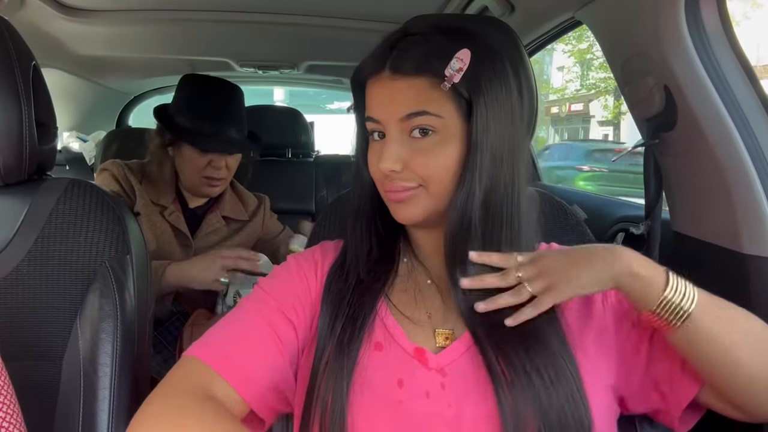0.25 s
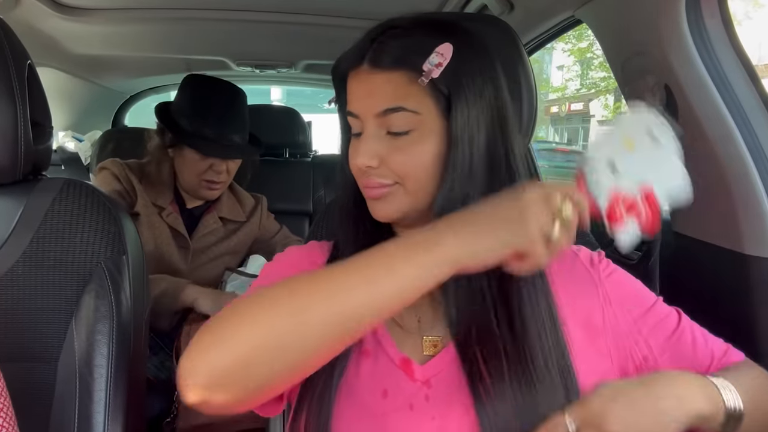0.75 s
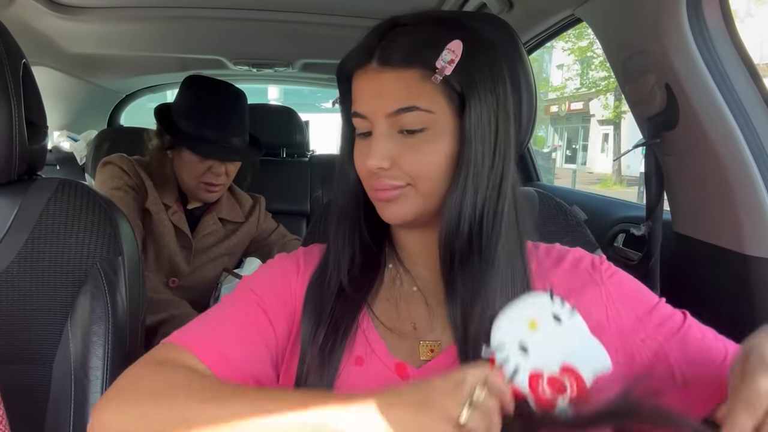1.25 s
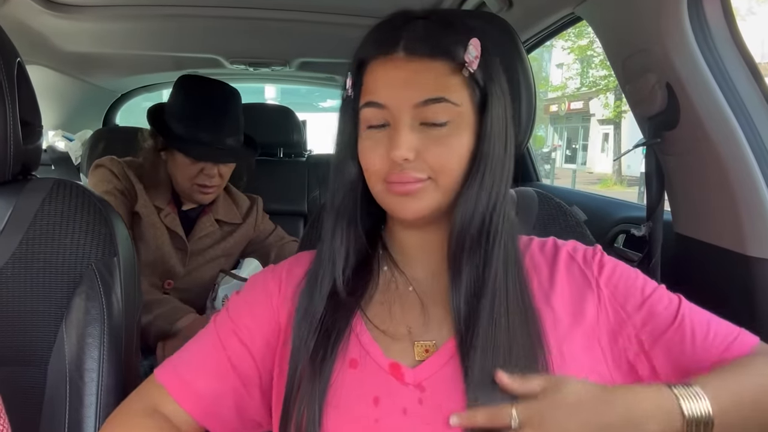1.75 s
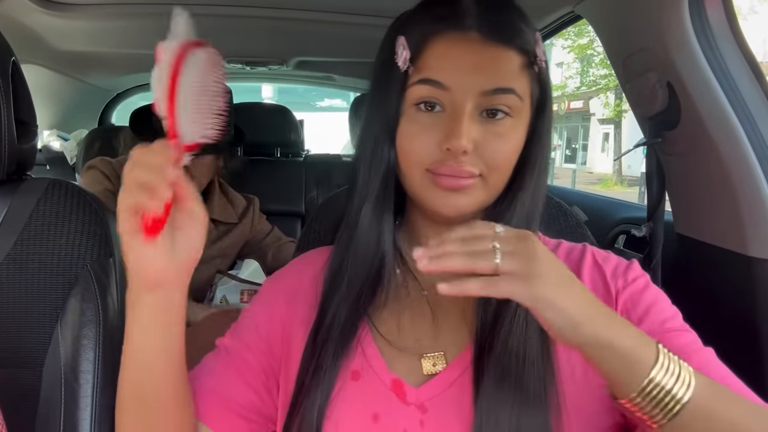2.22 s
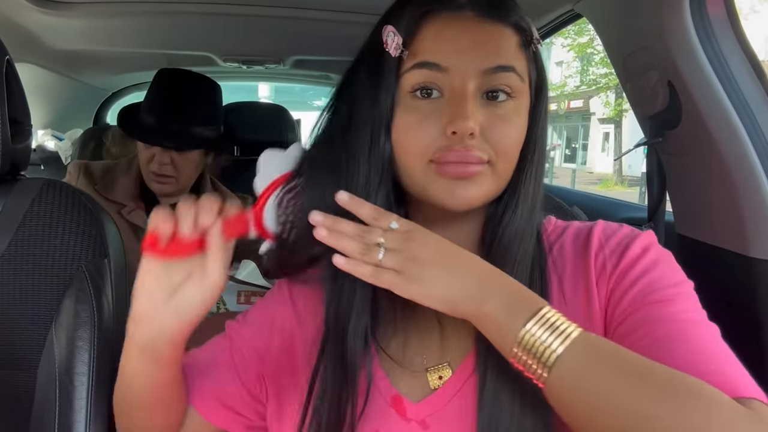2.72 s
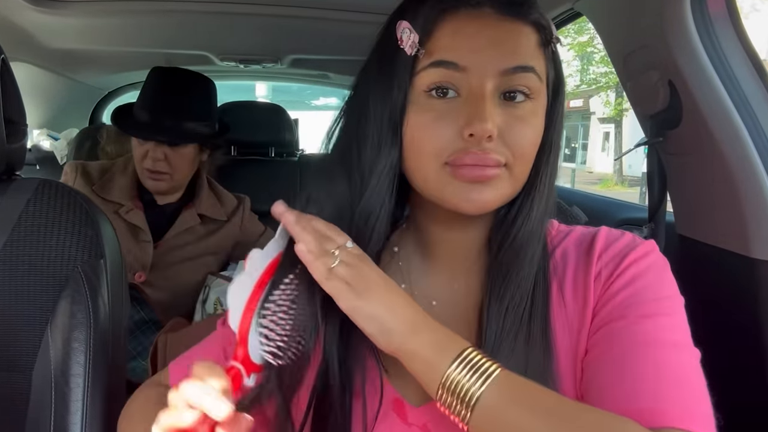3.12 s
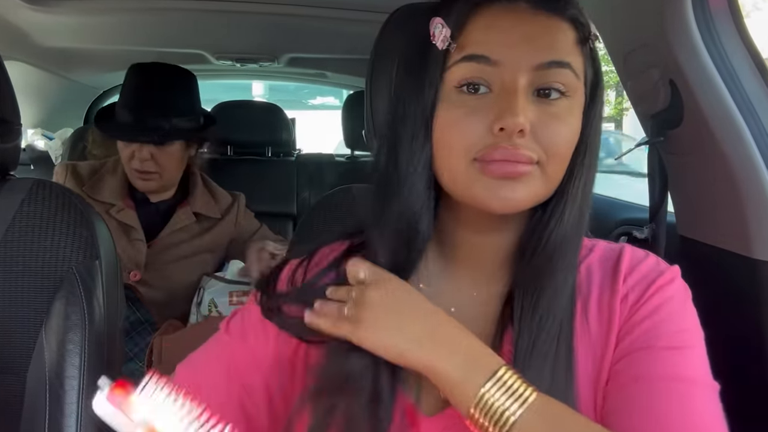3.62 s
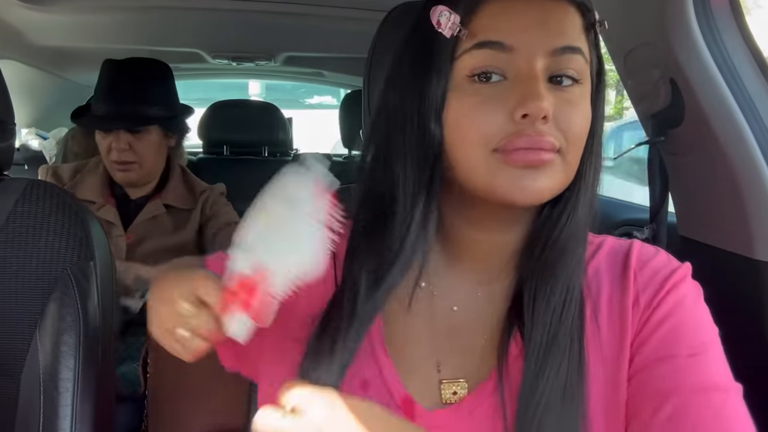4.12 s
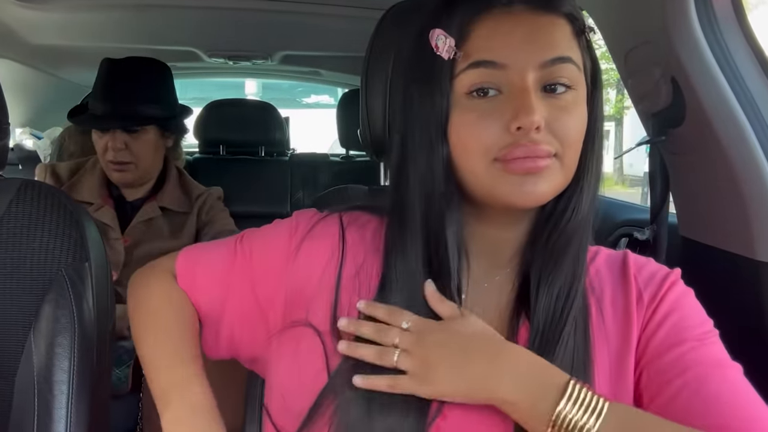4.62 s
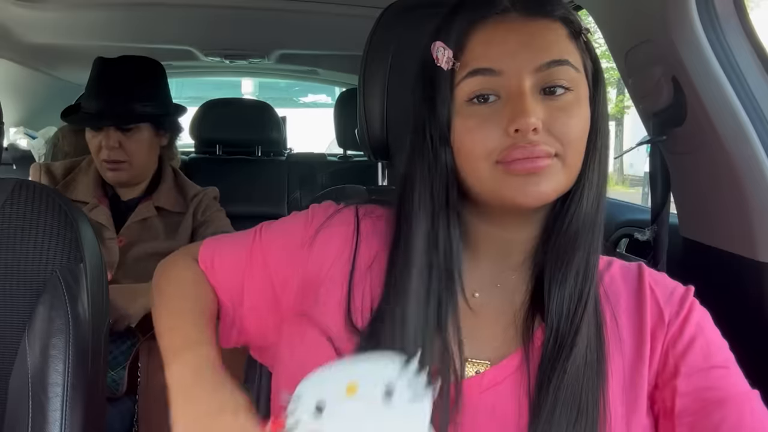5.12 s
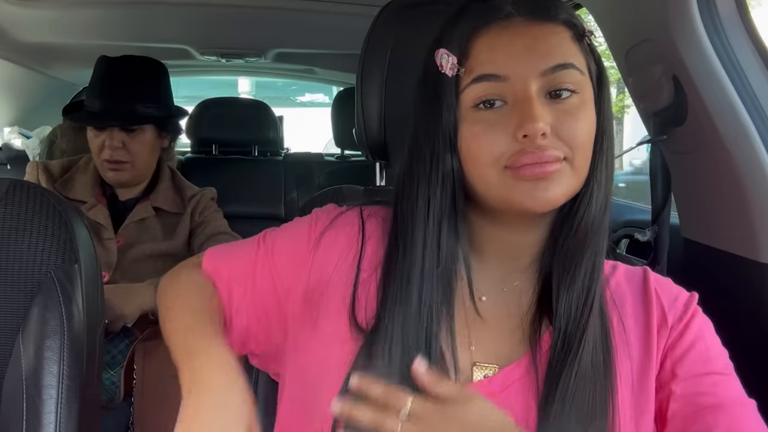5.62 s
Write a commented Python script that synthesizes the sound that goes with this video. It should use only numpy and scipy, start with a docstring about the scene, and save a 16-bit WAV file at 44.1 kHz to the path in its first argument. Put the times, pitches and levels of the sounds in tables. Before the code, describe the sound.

Inside a moving car, a low engine drone and tyre rumble while someone brushes long hair close by, with small clicks and hard plastic knocks.

```python
"""Throughout, the drone of an engine is heard inside a moving car, with a booming body and tyre rumble: wavering
tones and coloured noise. Close to the two ports of a phone on the dashboard, a passenger brushes and smooths long
hair (grainy friction noise); jewellery and small things tick and squeak. To the right a hollow thing is jostled
(slips and taps on resonances). The car takes a bump, and a plastic object knocks twice around it
and twice, harder, near the end (dying modes with a crack and a thud)."""
import sys
import numpy as np
from scipy import signal
from scipy.fft import rfft, irfft, next_fast_len
from scipy.io import wavfile
from scipy.ndimage import uniform_filter1d, map_coordinates

SR = 44100
rng = np.random.default_rng(int(sys.argv[2]) if len(sys.argv) > 2 else 0)


def put_to_file(sound):
    """Save the sound as 16-bit audio at rate SR, in the file named by the first command-line argument."""
    columns = np.atleast_2d(sound).T  # one column per channel
    safe = np.clip(columns, -1, 1)
    whole_steps = np.round(safe * 32767)
    wavfile.write(sys.argv[1], SR, whole_steps.astype(np.int16))


N = 258152
TIME = np.arange(N) / SR
AGE = TIME[:SR // 2]  # time since the start of a short sound, s
# what the two microphone ports hear of things close by: lag of the right port, s; direct share, 0-1
PORT_LAG_S, RASP_SHARE, HISS_SHARE = .00018, .35, .7


def undb(db):
    """Decibels to gain."""
    return 10 ** (np.asarray(db) / 20)


def unit(x):
    """Scale to rms 1."""
    return x / np.sqrt(np.mean(x ** 2))


def curves(table):
    """One control signal per column, in straight lines between the points."""
    s, *columns = np.transpose(table)
    return [np.interp(TIME, s, c) for c in columns]


def walk(rate):
    """Slow random wandering at rms 1, with rate fresh values per second."""
    k = int(SR / rate)
    steps = np.repeat(rng.standard_normal(N // k + 1), k)
    smooth = uniform_filter1d(uniform_filter1d(steps, k), k)
    return unit(smooth[:N])


def shape(x, gain):
    """Filter by a response given as a function of frequency."""
    n = x.shape[-1]
    size = next_fast_len(n + 4096)
    f = np.maximum(np.fft.rfftfreq(size, 1 / SR), 1)
    return irfft(rfft(x, size) * gain(f), size)[..., :n]


def colour(x, points):
    """Give x a response of (f/Hz, level/dB) points, at rms 1."""
    hz, db = np.transpose(points)
    return unit(shape(x, lambda f: undb(np.interp(np.log(f), np.log(hz), db))))


def band(f, hz, width):
    """Response of one resonance."""
    return 1 / (1 + 1j * (f * f - hz * hz) / (f * width))


def spread(x, wide_hz):
    """Two unrelated signals become left and right: alike in the bass, apart above wide_hz."""
    side = shape(x[1], lambda f: f / np.hypot(f, wide_hz))
    return np.array([x[0] + side, x[0] - side])


def ports(x, lag_s, share):
    """Close sound reaches the right port later and a quarter cycle turned; the rest is diffuse."""
    direct = shape(x[0], lambda f: 1j * np.exp(-2j * np.pi * f * lag_s))
    right = np.sqrt(share) * direct + np.sqrt(1 - share) * x[1]
    return np.array([x[0], right])


def pan(db):
    """Left and right gains for a left-minus-right level."""
    return undb(np.array([[db], [-db]]) / 2)


def add(out, s, db, sound):
    """Lay a sound into out at time s with the given peak level."""
    i = int(s * SR)
    scaled = undb(db) * sound / np.abs(sound).max()
    out[:, i:i + len(AGE)] += scaled[..., :N - i]


def fade(t60, rise):
    """Envelope of a blow: soft start, exponential fall."""
    return (1 - np.exp(-(AGE / rise) ** 2)) * np.exp(-np.log(1000) * AGE / t60)


def burst(t60, rise):
    """A dying puff of noise for each channel."""
    return rng.standard_normal((2, len(AGE))) * fade(t60, rise)


def ring(hz, t60, rise, skew):
    """A dying tone that reaches the two channels skew radians out of step."""
    offset = np.array([[skew], [-skew]]) / 2
    return np.sin(2 * np.pi * hz * AGE + offset) * fade(t60, rise)


def crackle(envelope, rate, size_db):
    """A cluster of tiny noisy slips of uneven size, timed alike in both channels."""
    slips = (rng.random(len(AGE)) < rate / SR) * undb(size_db * rng.random(len(AGE)))
    return rng.standard_normal((2, len(AGE))) * uniform_filter1d(slips, 8) * envelope


def friction(rate, size_db, grain_db):
    """Smooth sliding noise with many tiny slips of uneven size."""
    slips = (rng.random(N) < rate / SR) * undb(size_db * np.minimum(rng.exponential(size=N), 4))
    energy = signal.lfilter([1], [1, -np.exp(-1 / (0.0049 * SR))], slips)  # each slip dies over 4.9 ms
    loudness = np.sqrt(1 + undb(grain_db) ** 2 * energy / energy.mean())
    return rng.standard_normal((2, N)) * loudness


def bristle_ticks(count, size_db, t60):
    """Single bristles flick free, each with its own pitch and strength."""
    out = np.zeros((2, N))
    age = AGE[:SR // 50]
    for when, pitch, strength, turn in rng.random((count, 4)):
        hz = 1300 * 6 ** pitch
        i = int(when * (N - len(age)))
        phase = 2 * np.pi * (hz * age + np.array([[0], [turn]]))
        out[:, i:i + len(age)] += undb(-size_db * strength) * np.sin(phase) * np.exp(-np.log(1000) * age / t60)
    return unit(out)


# strokes of brush and hands over hair and cloth, before the gain of each layer:
# (t/s, length/s, level/dB, strand hiss relative to it/dB, cloth rub relative to it/dB)
HAIR_STROKES = [(0, 0.13, -55.5, 0, -12), (0.115, 0.24, -51, -6, -4), (0.405, 0.17, -44, -4, -4.5),
                (0.647, 0.12, -45, -4.5, 1.5), (0.85, 0.35, -49, -6, 5.5), (1.035, 0.06, -50, -1, -9),
                (1.137, 0.16, -53, -4, 2), (1.305, 0.22, -56.5, -3, 3), (1.546, 0.043, -50.5, -4.5, 0),
                (1.652, 0.36, -54, -3.5, 1), (2.053, 0.11, -46, -2.5, 4.5), (2.31, 0.38, -54, -5.5, 2),
                (2.663, 0.51, -50.5, -4, 5), (3.341, 0.18, -53.5, -5, 11.5), (3.499, 0.41, -45.5, -6.5, 2),
                (3.605, 0.1, -46, -6, -13), (3.89, 0.072, -41, -8, -6.5), (4.035, 0.16, -43, -7.5, 0),
                (4.25, 0.23, -51.5, -5.5, 7.5), (4.557, .25, -62.5, 2, 5), (4.833, 0.18, -53.5, -4.5, -6),
                (5.03, 0.062, -49, -2, 5.5), (5.09, 0.24, -50, -4, 2.5), (5.307, 0.4, -55, -8, 3.5),
                (5.724, 0.15, -46.5, -12, 6.5)]
# rustle between strokes, before the same gains: (level/dB, strand hiss relative/dB, cloth rub relative/dB)
RESTING_RUSTLE = (-62.5, -0.78, 2.1)
# a stroke grips, eases off as it travels, and lets go
GRIP_S, EASE_DB_PER_S, LET_GO_S = 0.019, 3.5, 0.073


def stroke_gains():
    """Gains of bristles, strands and cloth: each stroke swells out of a resting rustle."""
    rest_db, hiss_db, cloth_db = RESTING_RUSTLE
    power = undb(rest_db + np.array([[0], [hiss_db], [cloth_db]])) ** 2
    for s, length, db, hiss_db, cloth_db in HAIR_STROKES:
        age = np.maximum(TIME - s, 0)
        grip = np.minimum(age / GRIP_S, 1)
        let_go = np.exp(-np.maximum(age - length, 0) / LET_GO_S)
        envelope = grip * undb(-EASE_DB_PER_S * age) * let_go
        layers = undb(db + np.array([[0], [hiss_db], [cloth_db]]))
        power = power + (layers * envelope) ** 2
    return np.sqrt(power)


# colours of bristles, strands and cloth: (f/Hz, level/dB)
BRISTLE_COLOUR = [(500, -14), (1200, -4), (2400, 0), (3600, .5), (5500, -2.5), (7500, -1.5), (9500, -8),
                  (16000, -18)]
HAIR_STRAND_COLOUR = [(4000, -25), (9000, -15), (10800, -2), (13000, 0), (14500, -9), (16000, -10)]
SLEEVE_COLOUR = [(150, -12), (330, -2), (480, -3), (750, 0), (900, -2), (1350, 0), (1700, -8), (4000, -24)]
# centres of the ranges in which the bristles rasp: (f/Hz)
TUFT_BANDS = [1000, 1400, 2000, 2800, 4000, 5600, 8000]
# how unevenly the tufts let go: spread in dB, changes per s
TUFT_DB, TUFT_RATE = 2.8, 40


def hair(brush_db, strands_db, cloth_db):
    """Bristles rasp and tick, strands hiss and sleeves rub, all with the same strokes."""
    rasp, hiss, rub = stroke_gains()
    bristles = ports(friction(rate=270, size_db=12.5, grain_db=-8.0), PORT_LAG_S, RASP_SHARE)
    fibres = ports(friction(rate=500, size_db=6, grain_db=-2), PORT_LAG_S, HISS_SHARE)
    sleeves = spread(friction(rate=150, size_db=8.0, grain_db=6.5), wide_hz=560)
    # the rasp flickers in pitch as one tuft after another lets go
    tufts = 0
    for hz in TUFT_BANDS:
        tuft = shape(bristles, lambda f: band(f, hz, hz / 3))
        tufts = tufts + tuft * undb(TUFT_DB * walk(TUFT_RATE))
    ticks = undb(-7) * bristle_ticks(count=1500, size_db=20, t60=.007)
    brush = (colour(tufts, BRISTLE_COLOUR) + ticks) * rasp * undb(brush_db) * pan(db=-1.0)
    strands = colour(fibres, HAIR_STRAND_COLOUR) * hiss * undb(strands_db)
    cloth = colour(sleeves, SLEEVE_COLOUR) * rub * undb(cloth_db) * pan(db=-0.5)
    flicker = undb(1.1 * walk(40) + 1.0 * walk(14))
    return (brush + strands) * flicker + cloth


# short scratches of the brush through tangles: (t/s, peak level before gain/dB, centre f/Hz, length/s)
TANGLE_SCRATCHES = [(0.502, -30, 2400, 0.024), (0.54, -27.5, 3280, 0.026), (0.693, -30.5, 1900, 0.037),
                    (0.725, -32, 2200, 0.027), (.75, -35, 4500, 0.039), (.775, -40, 6000, .015),
                    (0.794, -31, 3000, 0.055), (0.873, -34.5, 1600, 0.039), (3.69, -30.5, 3500, 0.039),
                    (4.091, -31, 1900, 0.044), (4.888, -34, 7000, .02), (5.136, -29, 3400, 0.011)]


def scratches(gain_db):
    """The brush tears through a tangle: a short swell of bristle crackles."""
    out = np.zeros((2, N))
    for s, db, hz, length in TANGLE_SCRATCHES:
        swell = np.sin(np.pi * np.minimum(AGE / length, 1) ** .5)
        grains = crackle(swell, rate=900, size_db=9)
        add(out, s, db + gain_db, shape(grains, lambda f: band(f, hz, 1.6 * hz) ** 2))
    return out


# bristles and nails catching in the hair: (t/s, peak level before gain/dB, t60/s)
HAIR_SNAGS = [(0.3507, -29.5, 0.034), (0.4206, -34.5, 0.31), (1.0563, -30.5, 0.054), (2.098, -32.5, 0.21),
              (2.255, -36, 0.041), (3.8663, -28.5, 0.068), (3.919, -26, 0.2), (4.43, -40, 0.089),
              (4.469, -39, .061), (4.56, -42, .07), (4.618, -32, 0.12), (4.885, -41, 0.074),
              (5.373, -41, 0.032)]


def snags(gain_db):
    """Bristles and nails catch in the hair: bright puffs of noise close to the ports."""
    out = np.zeros((2, N))
    for s, db, t60 in HAIR_SNAGS:
        add(out, s, db + gain_db, shape(burst(t60, rise=t60 / 50), lambda f: band(f, 13500, 9600)))
    return ports(out, PORT_LAG_S, HISS_SHARE)


# clicks of jewellery and small things:
# (t/s, peak level before gain/dB, centre f/Hz, clear ring relative to the noise/dB)
SMALL_CLICKS = [(0.049, -56, 800, -12), (0.08, -40, 1760, -5), (.352, -32, 2780, -12),
                (0.363, -37.5, 900, -3), (0.39, -36, 1950, -15), (1.058, -33, 4500, -11),
                (1.074, -39, 2540, -12), (1.084, -35.5, 2140, -4), (1.098, -36.5, 3260, -1),
                (1.8325, -36.5, 1046, -7), (1.9962, -40.5, 1845, -9), (2.2553, -45, 2740, -3),
                (2.825, -37, 1200, -17), (2.863, -43, 2930, -2), (3.036, -44, 1060, -3),
                (3.103, -42, 1960, -5), (3.132, -42, 1210, -11), (3.402, -40, 2000, -16),
                (3.403, -32, 790, -7), (3.558, -37, 837, 1), (3.61, -41.5, 600, 1),
                (4.122, -33.5, 1300, -11), (4.2807, -34, 1370, -8), (4.305, -36, 1070, -4),
                (4.4861, -35.5, 1280, -12), (4.598, -44.5, 1290, -10), (4.635, -42.5, 1720, -5),
                (4.96, -39.5, 1390, -3), (5.628, -43.5, 2670, 4), (5.7144, -34, 2826, -2)]


def clicks(gain_db):
    """Jewellery and small things tick: a band of dying noise with a ring on one pitch."""
    out = np.zeros((2, N))
    for s, db, hz, ring_db in SMALL_CLICKS:
        puff = spread(burst(t60=0.085, rise=0.0015), wide_hz=1200)
        tick = shape(puff, lambda f: band(f, hz, 1.37 * hz) ** 2)
        tone = ring(hz, t60=.055, rise=0.0005, skew=0.88)
        add(out, s, db + gain_db, unit(tick) + undb(ring_db) * unit(tone))
    return out * pan(db=-1.0)


# faint squeaks of smooth surfaces: (t/s, length/s, peak level before gain/dB, f/Hz, glide/share of f)
SURFACE_SQUEAKS = [(0.15, 0.024, -34.5, 1606, -.03), (1.55, .16, -47, 1483, 0.029),
                   (1.577, 0.026, -41.5, 1080, -.08)]


def squeaks(gain_db):
    """Smooth surfaces squeak faintly against each other: a thin, wavering tone that swells and dies."""
    out = np.zeros((2, N))
    for s, length, db, hz, glide in SURFACE_SQUEAKS:
        part = np.minimum(AGE / length, 1)
        pitch = hz * (1 + glide * part + .012 * walk(120)[:len(AGE)])
        phase = 2 * np.pi * np.cumsum(pitch) / SR + np.array([[0], [-1]])
        swell = np.sqrt(4 * part * (1 - part))
        add(out, s, db + gain_db, np.sin(phase) * swell)
    return out


def stick_slip(rate, size_db):
    """Separate slips at uneven gaps around a mean rate."""
    gap, size = rng.random((int(2 * rate * N / SR), 2)).T
    when = (np.cumsum(.5 + gap) * SR / rate).astype(int)
    return unit(np.bincount(when, undb(size_db * size), N)[:N])


# spells in which the hollow thing is jostled, one list each: (t/s, level before gain/dB)
JOSTLE_SPELLS = [
    [(0.0, -67), (0.23, -41), (0.32, -47.5), (0.42, -49)],
    [(.85, -51.5), (1.1, -49.5), (1.19, -41.5), (1.32, -50.5), (1.41, -44.5), (1.49, -40.5), (1.58, -48),
     (1.75, -70)],
    [(3.95, -70), (4.13, -44), (4.32, -40), (4.42, -41), (4.55, -47.5), (4.68, -62)],
    [(4.95, -57), (5.07, -39.5), (5.18, -63), (5.32, -40), (5.42, -41)],
]
# its modes while it rubs, before the drift in pitch: (f/Hz, width/Hz, level/dB)
HOLLOW_MODES = [(547, 32, 5), (608, 34, 4), (812, 42, 8), (1004, 33, 7)]
# the rubbed tone shifts as the grip on it changes: share of the pitch, changes per s
HOLLOW_DRIFT, HOLLOW_DRIFT_RATE = .05, 30


def hollow_rub(gain_db, slide_db):
    """Slips and sliding noise ring the hollow body, whose tone shifts with the grip."""
    slide = unit(spread(rng.standard_normal((2, N)), wide_hz=597))
    slips = stick_slip(rate=55, size_db=8) + undb(slide_db) * slide

    def modes(f):
        return sum(undb(db) * band(f, hz, width) for hz, width, db in HOLLOW_MODES) * band(f, 575, 260)

    body = unit(shape(slips, modes))
    # reading the sound at a varying speed bends its pitch
    place = np.arange(N) + np.cumsum(HOLLOW_DRIFT * walk(HOLLOW_DRIFT_RATE))
    bent = [map_coordinates(side, [place - lag * SR], order=1, mode="mirror")
            for side, lag in zip(body, (0, PORT_LAG_S))]
    level = 0
    for spell in JOSTLE_SPELLS:
        s, db = np.transpose(spell)
        level = level + np.interp(TIME, s, undb(db + gain_db), 0, 0)
    return unit(np.array(bent)) * level


# distinct taps on the hollow thing: (t/s, peak level before gain/dB, f/Hz)
HOLLOW_TAPS = [(.049, -37, 587), (0.104, -42, 566), (.143, -39, 560), (.175, -27.5, 578), (.205, -36, 605),
               (.228, -40, 580), (.255, -37, 590), (.363, -29, 584), (1.181, -28, 508), (1.208, -34, 555),
               (1.265, -34.5, 560), (1.328, -40, 560), (1.357, -37, 522), (1.432, -39, 587),
               (1.468, -36, 606), (1.482, -29.5, 593), (1.511, -32, 470), (1.653, -41, 540),
               (4.38, -41, 581.6), (4.422, -34, 586), (4.472, -28, 580), (4.518, -31.5, 513),
               (4.54, -35.5, 586), (4.597, -40, 583), (4.958, -32.5, 583), (5.246, -32, 583),
               (5.31, -29, 586), (5.338, -24, 533), (5.376, -16, 587)]


def hollow_taps(gain_db, scuff_db):
    """Each tap gives a soft dying tone with a little scuffing noise."""
    out = np.zeros((2, N))
    for s, db, hz in HOLLOW_TAPS:
        scuff = shape(spread(burst(t60=.04, rise=.002), wide_hz=500), lambda f: band(f, 700, 500) ** 2)
        tone = ring(hz, t60=0.021, rise=0.0089, skew=1.3)
        # started 1 ms early to allow for the soft rise
        add(out, s - .001, db + gain_db, unit(tone) + undb(scuff_db) * unit(scuff))
    return out


def hollow_thing(rub_db, tap_db, scuff_db, slide_db):
    """The hollow thing, rubbed and tapped, lies to the right of the phone."""
    return (hollow_rub(rub_db, slide_db) + hollow_taps(tap_db, scuff_db)) * pan(db=-4.5)


# modes of the plastic object, before favouring and detuning: (f/Hz, level/dB, t60/s)
PLASTIC_MODES = [(260, -7, 0.12), (315, -4, 0.062), (379, 0, 0.13), (552, -2, 0.091), (769, 0.5, 0.053),
                 (1013, 1, 0.03), (1225, 2, 0.028), (1350, 1.5, 0.031), (1557, -7, 0.06), (1977, -7, 0.037),
                 (2157, -0.5, 0.035), (2377, -4, 0.052), (2980, -13, 0.035), (3380, -2.5, 0.032)]
DETUNE = .01  # spread of each mode's pitch from contact to contact, as a share


def plastic_ring(spot_hz, favour):
    """One contact rings all modes of the plastic; the spot that is struck favours one pitch."""
    body = 0
    for hz, mode_db, t60 in PLASTIC_MODES:
        boost = 1 + favour * abs(band(hz, spot_hz, 0.25 * spot_hz))
        size = undb(mode_db) * boost * rng.choice([-1, 1])
        pitch = hz * (1 + DETUNE * rng.standard_normal())
        body = body + size * ring(pitch, t60, rise=0.00013, skew=min(hz / 700, 1.6))
    return body


# hard knocks of a plastic object: (t/s, peak level of first ring/dB, favoured f/Hz,
# crack relative to it/dB, crack edge f/Hz, left minus right/dB,
# thump of its support: level/dB, f/Hz, lag/s, t60/s)
PLASTIC_KNOCKS = [(2.5125, -27, 434, 2, 3540, -6, -14.5, 210, 0.008, 0.037),
                  (2.6931, -24, 1370, 1.5, 3320, -1, -17.5, 164, 0.0045, 0.12),
                  (5.4179, -11.5, 2050, -4, 5500, -3, -12.5, 307, 0.0037, 0.037),
                  (5.494, -7.5, 950, -5.5, 10000, -3, -17, 134, 0.0072, 0.15)]
# the object chatters as it settles: contacts, mean s between them, dB per contact
CONTACTS, SETTLE_S, SETTLE_DB = 4, .0034, -6.5


def knocks(favour, thud_db):
    """Each knock cracks, thuds and rings the plastic as it lands and chatters to rest."""
    out = np.zeros((2, N))
    for s, db, spot_hz, crack_db, edge_hz, pan_db, *_ in PLASTIC_KNOCKS:
        for contact in range(CONTACTS):
            lag = contact * SETTLE_S * rng.uniform(.85, 1.15)
            add(out, s + lag, db + contact * SETTLE_DB, plastic_ring(spot_hz, favour) * pan(pan_db))
        grains = crackle(fade(t60=0.062, rise=0.0017), rate=3500, size_db=8)
        crack = shape(grains, lambda f: band(f, spot_hz, 1.0 * spot_hz) / np.hypot(1, (f / edge_hz) ** 3))
        thud = shape(spread(burst(t60=0.17, rise=0.00095), wide_hz=600), lambda f: band(f, 327, 250) ** 2)
        add(out, s, db + crack_db, crack * pan(pan_db))
        add(out, s, db + thud_db, thud * pan(pan_db))
    return out


def edge_scrape():
    """An edge scrapes just before the last knock lands: a very short puff of bright noise."""
    out = np.zeros((2, N))
    scrape = shape(burst(t60=0.011, rise=0.006), lambda f: band(f, 4000, 9800))
    add(out, s=5.4895, db=-12, sound=scrape)
    return out


# dull bumps through the seats and floor: (t/s, peak level/dB, f/Hz, t60/s)
FLOOR_BUMPS = [(.174, -35, 285, 0.076), (.724, -23.5, 229, 0.048), (1.073, -32.5, 423, 0.018),
               (1.18, -32.5, 237, 0.14), (2.254, -22, 126, 0.068), (2.545, -22, 131, 0.14),
               (2.623, -29, 328, 0.037), (2.637, -26.5, 335, 0.07), (2.722, -21.5, 230, .03),
               (2.818, -34, 267, 0.047), (3.404, -26, 317, 0.023), (3.413, -22.5, 122, 0.11),
               (3.613, -25.5, 333, 0.2), (4.105, -26.5, 368, .08), (4.173, -32, 350, 0.057),
               (4.466, -23.5, 133, 0.1), (4.957, -27.5, 256, 0.073), (5.315, -23, 109, 0.18),
               (5.435, -22, 122, 0.26), (5.506, -18.5, 76, 0.16), (5.54, -24, 260, 0.068)]
BUMP_RISE_CYCLES = 0.32  # the lower the tone, the more slowly the blow builds up


def bumps(thud_db):
    """Soft blows, alone or under a knock: one damped low tone inside a dull thud."""
    out = np.zeros((2, N))
    thumps = [(s + lag, db, hz, t60) for s, *_, db, hz, lag, t60 in PLASTIC_KNOCKS]
    for s, db, hz, t60 in list(FLOOR_BUMPS) + thumps:
        rise = BUMP_RISE_CYCLES / hz
        thud = shape(spread(burst(t60, rise), wide_hz=506), lambda f: band(f, hz, 0.61 * hz) ** 2)
        tone = ring(hz, t60, rise, skew=0.34)
        add(out, s, db, unit(tone) + undb(thud_db) * unit(thud))
    return out


def cabin(x, wet_db, t60):
    """Glass throws back a few early echoes; seats and roof lining soon swallow them."""
    echoes = burst(t60, rise=0.004) * (rng.random((2, len(AGE))) < 1200 / SR)  # about 1200 echoes per s
    echoes = shape(echoes, lambda f: 1 / (1 + 1j * f / 3500))
    echoes /= np.sqrt(np.sum(echoes ** 2, axis=1, keepdims=True))
    return x + undb(wet_db) * signal.fftconvolve(x, echoes, axes=1)[:, :N]


def drone(hz, db, waver_db, second_db, skew):
    """A low wavering tone with a weak octave; its standing wave meets the channels out of step."""
    phase = 2 * np.pi * (np.cumsum(hz) / SR + rng.random()) + np.array([[skew], [-skew]]) / 2
    tone = np.sin(phase) + undb(second_db) * np.sin(2 * phase)
    return np.sqrt(2) * undb(db + waver_db * walk(12)) * tone


# firing rate of the engine, which rises a little, then sinks as the car slows: (t/s, f/Hz)
FIRING_RATE = [(0, 56.03), (1.3, 57.3), (2.5, 57.95), (3.2, 55), (4.55, 53.47), (5.45, 51.87), (5.85, 48.8)]
# level of its drone, which swells and dips: (t/s, level before gain/dB)
ENGINE_LEVEL = [(0.0, -37.5), (.2, -30), (.36, -42), (0.53, -29.5), (0.68, -42.5), (0.78, -28),
                (1.08, -32.5), (1.22, -44), (1.4, -35.5), (1.7, -40), (2.05, -30), (2.45, -40), (2.75, -38),
                (3.03, -33), (3.11, -53), (3.21, -27.5), (3.58, -26), (3.67, -34.5), (3.77, -26.5),
                (3.88, -27), (3.96, -32.5), (4.07, -28), (4.45, -25.5), (4.72, -26.5), (5.05, -18.5),
                (5.2, -31.5), (5.35, -25), (5.48, -27), (5.54, -22), (5.72, -36.5), (5.85, -26)]


def engine(gain_db):
    """A low drone whose pitch follows the firing rate and whose level swells and wavers."""
    hz, = curves(FIRING_RATE)
    db, = curves(ENGINE_LEVEL)
    return drone(hz, db + gain_db, waver_db=2.0, second_db=-19.5, skew=0.33)


# boom of the car body, which leaps as the car takes a bump: (t/s, level before gain/dB)
BODY_BOOM_LEVEL = [(0, -39), (.2, -42), (.9, -51.5), (1.6, -56), (1.85, -43.5), (2.53, -39), (2.56, -24),
                   (2.615, -29.5), (2.645, -39), (2.9, -40.5), (3.55, -35), (4.45, -36), (4.85, -48),
                   (5.5, -38), (5.85, -43)]


def body_boom(gain_db, wander_hz):
    """The body booms around its one low resonance."""
    db, = curves(BODY_BOOM_LEVEL)
    hz = 40.17 + wander_hz * walk(9.7)
    return drone(hz, db + gain_db, waver_db=-1.5, second_db=-9.5, skew=0.36)


# tyres on the road: (t/s, level before gain/dB)
TYRE_LEVEL = [(0, -40.5), (.45, -44), (1.3, -38.5), (1.8, -42), (2.25, -39), (3.25, -37.5), (3.65, -35.5),
              (4.4, -32.5), (4.8, -35.5), (5.85, -35.5)]
# colour of the rumble: (f/Hz, level/dB)
TYRE_COLOUR = [(20, -29), (35, -26), (60, 6.5), (82, 3.5), (100, 1), (128, -0.5), (190, -7), (380, -11.5),
               (460, -19), (1000, -29.5), (1800, -40), (5000, -39), (15000, -123)]


def road(gain_db):
    """Tyre rumble through the floor, fluttering with the road surface."""
    db, = curves(TYRE_LEVEL)
    rumble = colour(spread(rng.standard_normal((2, N)), wide_hz=304), TYRE_COLOUR)
    flutter_db = 1.2 * walk(18)
    return rumble * undb(db + gain_db + flutter_db) * pan(db=-1.75)


def scene():
    """The car's continuous noise under everything that is handled in it."""
    rustle = hair(brush_db=0.0, strands_db=3.0, cloth_db=-3.5) + scratches(gain_db=4.5)
    rustle = rustle + snags(gain_db=6.5) + clicks(gain_db=4.5) + squeaks(gain_db=-5)
    blows = hollow_thing(rub_db=-3, tap_db=2.5, scuff_db=-15, slide_db=3)
    blows = blows + knocks(favour=3.0, thud_db=-6.5) + edge_scrape() + bumps(thud_db=-1.5)
    near = cabin(rustle, wet_db=-15, t60=.06) + cabin(blows, wet_db=-14, t60=0.076)
    car = engine(gain_db=-0.5) + body_boom(gain_db=5.5, wander_hz=1.15) + road(gain_db=1.76)
    return near + car


def record(dry):
    """The phone drops the deepest bass, rounds the loudest peaks and cuts the top."""
    dry = signal.sosfilt(signal.butter(3, 26, "high", fs=SR, output="sos"), dry)
    dry = np.tanh(1.8 * dry) / 1.8
    return signal.sosfilt(signal.ellip(10, .2, 80, 15900, fs=SR, output="sos"), dry)


dry = scene()
out = record(dry)
put_to_file(out)
```